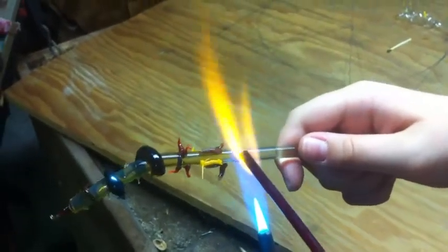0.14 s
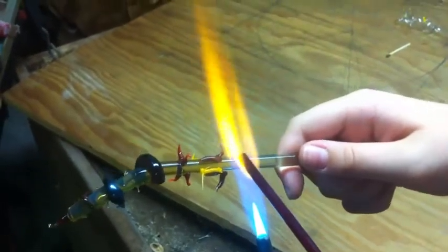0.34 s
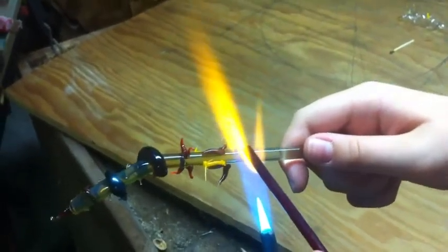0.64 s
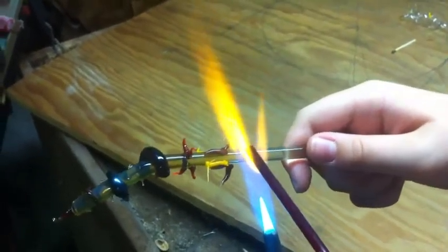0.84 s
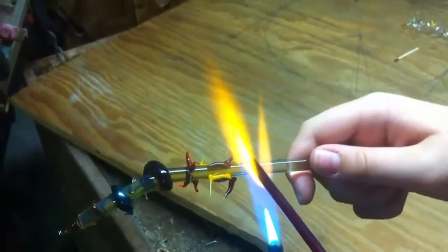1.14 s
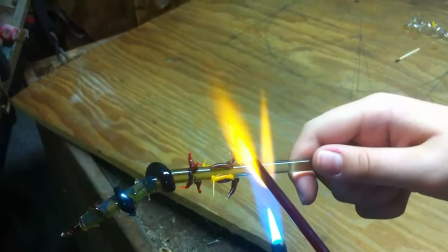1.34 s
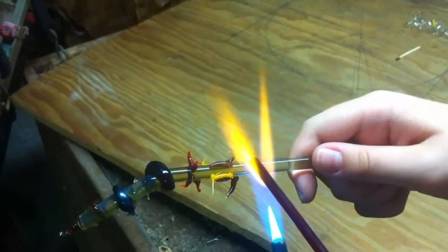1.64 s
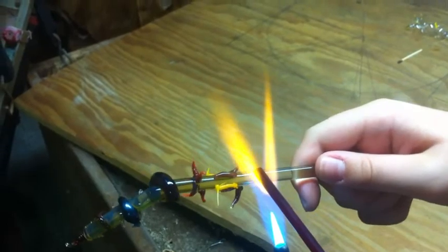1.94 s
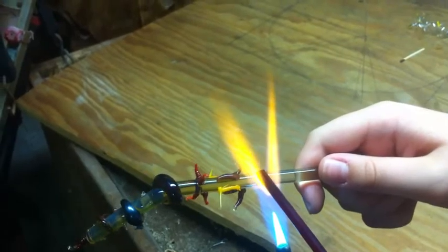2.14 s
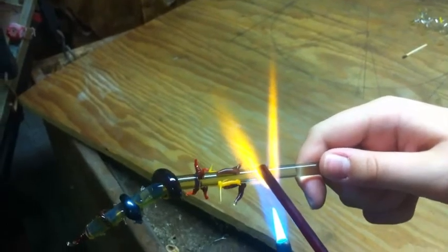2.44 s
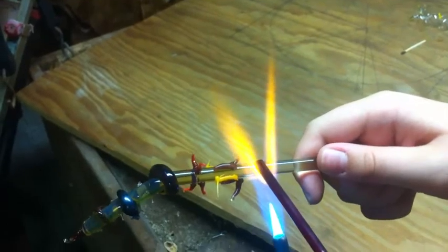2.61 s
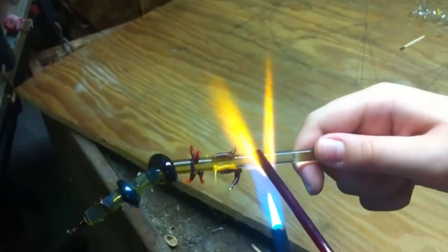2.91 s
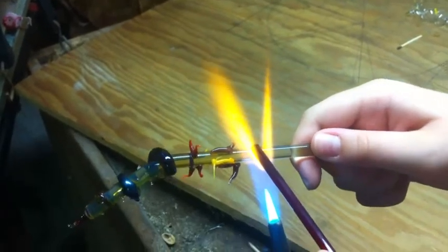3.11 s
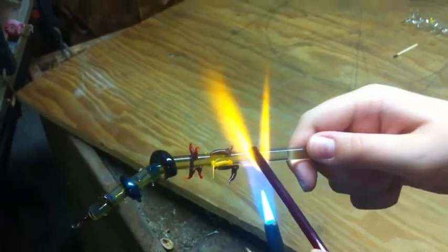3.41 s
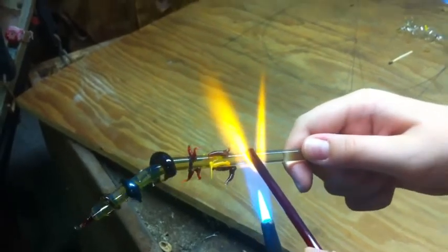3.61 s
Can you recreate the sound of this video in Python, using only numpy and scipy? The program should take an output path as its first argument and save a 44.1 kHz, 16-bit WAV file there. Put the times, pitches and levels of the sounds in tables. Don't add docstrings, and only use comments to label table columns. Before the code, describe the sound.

A small gas torch burns with a steady rough roar and bright hiss over a workbench.

```python
import sys
import numpy as np
from scipy import signal
from scipy.fft import rfft, irfft
from scipy.io import wavfile

SR = 44100
rng = np.random.default_rng(int(sys.argv[2]) if len(sys.argv) > 2 else 0)


def invert_db(level):
    return 10 ** (np.asarray(level, dtype=float) / 20)


def int16_out(signal):
    q = np.round(np.clip(np.atleast_2d(signal).T, -1, 1) * 32767)
    wavfile.write(sys.argv[1], SR, q.astype(np.int16))


N = 165816
CUT_HZ = 15740


def level(x, rms_db):
    return x * invert_db(rms_db) / np.sqrt(np.mean(x ** 2))


def colour(x, points, shape=()):
    size = 8192
    hz = np.maximum(np.fft.rfftfreq(size, 1 / SR), 1)
    p = np.array(points, float)
    db = np.interp(np.log(hz), np.log(p[:, 0]), p[:, 1])
    db = db - 30 * np.maximum(np.log2(p[0, 0] / hz), 0)
    db = db - 12 * np.maximum(np.log2(hz / p[-1, 0]), 0)
    for centre_hz, width_hz, gain_db in shape:
        db = db + gain_db / (1 + (2 * (hz - centre_hz) / max(width_hz, 10)) ** 2)
    cepstrum = irfft(np.maximum(db, -90) * np.log(10) / 20)
    fold = np.r_[1, np.full(size // 2 - 1, 2.), 1, np.zeros(size // 2 - 1)]
    impulse = irfft(np.exp(rfft(cepstrum * fold)))
    return signal.fftconvolve(x, impulse)[:N]


def walk(rate_hz):
    low_pass = signal.butter(2, rate_hz, fs=SR, output="sos")
    w = signal.sosfiltfilt(low_pass, rng.standard_normal(N))
    return w / w.std()


def puff(length_s):
    t = np.arange(N // 10) / SR / length_s
    return (1 - np.exp(-8 * t)) * np.exp(-t)


def roar():
    # (frequency [Hz], density [dB per Hz])
    burn_colour = [(120, -47.5), (250, -15), (480, -12.5), (750, -3), (1300, -7), (2150, -7), (2500, -13),
                   (3300, -32)]
    # (frequency [Hz], width [Hz], gain [dB])
    bench_shape = [(405, 40, -6.5), (686, 22, -4.5), (790, 180, 1.5), (1025, 64, 6.5), (1495, 117, -6),
                   (1897, 34, 10), (1870, 34, -4.5), (2350, 40, -18), (2560, 140, -6.5), (2862, 28, -5.5),
                   (2984, 37, -29.5)]
    # (time [s], pop peak [dB], following swell [dB])
    flares = [(0.162, -27, -56.5), (0.361, -28, -58), (0.518, -37, -60), (0.554, -38, -55.5),
              (0.599, -37.5, -58), (0.742, -35, -62), (0.866, -31.5, -60), (1.084, -44, -60.5),
              (1.094, -37, -62.5), (1.097, -27.5, -57.5), (1.29, -47, -60), (1.313, -35.5, -60.5),
              (1.333, -31.5, -62), (1.734, -32, -58.5), (1.753, -29.5, -61.5), (1.911, -32.5, -60),
              (1.985, -49.5, -62.5), (2.113, -33, -59), (2.158, -33, -62), (2.517, -37.5, -58.5),
              (2.534, -31, -57), (2.561, -35, -60), (2.65, -35, -62), (2.8, -32.5, -58.5),
              (2.815, -26, -57.5), (2.897, -30, -54), (3.045, -31, -57.5), (3.231, -38, -62.5),
              (3.317, -39, -63), (3.55, -33, -59)]
    roar_db, smooth_db = -50.5, -9.5
    puffs_per_s, puff_spread_db, puff_cap_db = 1500, 2, 13
    flutter_db, flutter_hz, surge_db, surge_hz = 1.36, 43.2, .3, 6
    flare_s, flare_db, loudest_pop_db = .009, -1, -32.5

    when, how_big, which_sign = rng.random((3, N))
    size_db = np.minimum(-puff_spread_db * np.log(1 - how_big), puff_cap_db)
    size = invert_db(size_db) * np.where(which_sign < .5, -1, 1)
    puffs = level((when < puffs_per_s / SR) * size, 0)
    puffs = puffs + invert_db(smooth_db) * rng.standard_normal(N)
    steady = puffs * invert_db(flutter_db * walk(flutter_hz) + surge_db * walk(surge_hz))

    pops, swells = np.zeros(N), np.zeros(N)
    for s, pop_db, swell_db in flares:
        pops[int((s + .001) * SR)] = invert_db(min(pop_db + flare_db, loudest_pop_db))
        swells[int(s * SR)] = invert_db(swell_db)
    burst = signal.fftconvolve(swells, puff(flare_s))[:N] * np.roll(puffs, N // 3)

    click = np.r_[1., np.zeros(N - 1)]
    unit_peak = np.abs(colour(click, burn_colour, bench_shape)).max()
    flaring = colour(pops + burst, burn_colour, bench_shape) / unit_peak
    return level(colour(steady, burn_colour, bench_shape), roar_db) + flaring


def hiss():
    # (frequency [Hz], density [dB per Hz])
    jet_colour = [(2800, -22.5), (4300, -21.5), (6100, -20.5), (8500, -14), (9600, -8), (12500, -6.5),
                  (14300, -13), (15300, -10)]
    # (frequency [Hz], width [Hz], gain [dB])
    nozzle = [(3373, 110, 8), (3760, 100, 3.5), (4550, 220, 1), (5475, 300, 12), (6783, 330, 18.5),
              (7120, 120, 8), (7486, 170, -12), (7860, 370, 12), (8470, 300, -5), (9690, 250, 5),
              (10280, 300, 5.5), (11350, 350, 8), (12070, 170, -5.5), (13800, 130, -8.5)]
    # (frequency [Hz], width [Hz], gain [dB])
    hand = [(8550, 250, -6), (11220, 500, 3), (14400, 500, -7.5)]
    # (time [s], level [dB], nearness [0-1])
    flow = [
        (0, 1, 0),
        (.6, 1, .1),
        (1.2, 0, 0.3),
        (1.8, 0.65, .7),
        (2.3, 0.7, 0.99),
        (2.9, 0.82, .9),
        (3.2, -0.1, 0.4),
        (3.76, 0.5, 0.3),
    ]
    hiss_db = -51.5

    t = np.arange(N) / SR
    s, flow_db, nearness = np.array(flow).T
    near = np.clip(np.interp(t, s, nearness), 0, 1)
    gas = rng.standard_normal(N)
    jet = (1 - near) * colour(gas, jet_colour, nozzle) + near * colour(gas, jet_colour, nozzle + hand)
    return level(jet, hiss_db) * invert_db(np.interp(t, s, flow_db))


def room():
    # (frequency [Hz], level [dB rms])
    hum_lines = [
        (132.3, -77.5),
        (117, -82.5),
    ]
    # (frequency [Hz], density [dB per Hz])
    rush_colour = [(110, -26), (190, 0.5), (320, -1.5), (500, -3), (700, -8.5)]
    rush_db, wobble_db, wobble_hz = -65, 0.5, 2.9
    phase_rad, phase_hz = 0.65, 9

    t = np.arange(N) / SR
    hum = np.zeros(N)
    for hz, db in hum_lines:
        strength = np.sqrt(2) * invert_db(db + wobble_db * walk(wobble_hz))
        hum += strength * np.sin(2 * np.pi * hz * t + phase_rad * walk(phase_hz))
    return hum + level(colour(rng.standard_normal(N), rush_colour), rush_db)


def ticks():
    # (time [s], level [dB], length [s], brightness [0-1])
    tick_events = [
        (0.163, -47, 0.006, 0.35),
        (1.089, -42.5, .009, .2),
        (2.1045, -40, 0.0073, 0.97),
    ]
    # (frequency [Hz], density [dB per Hz])
    tick_colour = [(4200, -17), (5300, 3), (9000, -1), (15000, 1.5)]
    dull_hz = 7660

    grit = level(colour(rng.standard_normal(N), tick_colour), 0)
    dull = signal.sosfilt(signal.butter(4, dull_hz, fs=SR, output="sos"), grit)
    out = np.zeros(N)
    for s, db, length_s, bright in tick_events:
        envelope = invert_db(db) * puff(length_s)
        i = int(s * SR)
        scratch = dull + np.clip(bright, 0, 1) * (grit - dull)
        out[i:i + len(envelope)] += envelope * scratch[i:i + len(envelope)]
    return out


def scene():
    # (delay [s], level [dB])
    early_echoes = [
        (.0035, -21),
        (.009, -17.5),
        (.016, -14.5),
    ]
    flame = roar()
    echoes = sum(invert_db(db) * np.roll(flame, int(s * SR)) for s, db in early_echoes)
    return (flame + echoes + hiss() + room() + ticks())[None]


def phone(x):
    # (frequency [Hz], step [dB])
    step_points = [(100, -31.5), (400, -26.5), (700, -20), (2500, -20), (4000, -22.5), (5400, -20),
                   (7000, -17.5), (15000, -19.5)]
    fine_s = [.16, 1.088, 1.412, 1.436, 2.063, 2.11, 2.388, 2.597, 2.69, 3.131, 3.271, 3.48]
    fine_db, step_wander_db, rounding, window_bend = -6.5, 1.0, .4054, .04
    hop, grid = 1024, 879

    n, k = np.arange(2 * hop) + .5, np.arange(hop) + .5
    u = np.minimum(n, 2 * hop - n) / hop
    window = np.sin(np.pi / 2 * (u + window_bend * np.sin(2 * np.pi * u)))
    basis = np.cos(np.pi / hop * np.outer(n + hop / 2, k))
    hz = k * SR / 2 / hop

    lead = 2 * hop - grid
    padded = np.pad(x, (lead, 2 * hop), "reflect")
    starts = np.arange(0, len(padded) - 2 * hop, hop)
    lines = (padded[starts[:, None] + np.arange(2 * hop)] * window) @ basis

    frame_db = step_wander_db * rng.standard_normal(len(starts))
    frame_db[np.round((np.array(fine_s) * SR + lead) / hop - 1).astype(int)] = fine_db
    p = np.array(step_points, float)
    step = invert_db(np.interp(np.log(hz), np.log(p[:, 0]), p[:, 1]) + frame_db[:, None])
    count = np.floor((np.abs(lines) / step) ** (3 / 4) + rounding)
    lines = np.sign(lines) * count ** (4 / 3) * step * (hz < CUT_HZ)

    frames = lines @ basis.T * window * 2 / hop
    first, second = frames[:, :hop].ravel(), frames[:, hop:].ravel()
    out = np.r_[first, np.zeros(hop)] + np.r_[np.zeros(hop), second]
    return out[lead:lead + N]


def band_limit(x):
    return signal.sosfilt(signal.butter(12, 15970, fs=SR, output="sos"), x)


def record(dry):
    # (frequency [Hz], density [dB per Hz])
    residue_colour = [(8, 24), (40, 15), (100, 13), (2600, 0), (4500, -5), (6500, -5), (15000, -8),
                      (15500, -20)]
    smear_db, smear_hz, low_cut_hz = -26, 200, 95
    residue_db, flicker_db, flicker_hz = -87.5, 4.5, 8.1

    heard = phone(dry[0]) * (1 + invert_db(smear_db) * walk(smear_hz))
    heard = signal.sosfiltfilt(signal.butter(3, low_cut_hz, "high", fs=SR, output="sos"), heard)
    residue = level(colour(rng.standard_normal(N), residue_colour), residue_db)
    heard = heard + invert_db(flicker_db * walk(flicker_hz)) * residue
    spectrum = rfft(heard) * (np.fft.rfftfreq(N, 1 / SR) < CUT_HZ + 50)
    return band_limit(irfft(spectrum, N)[None])


dry = scene()
out = record(dry)
int16_out(out)
```